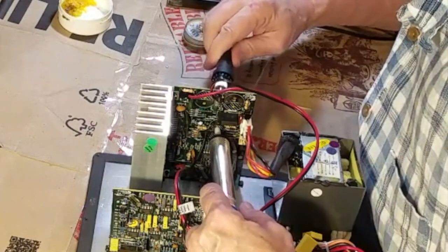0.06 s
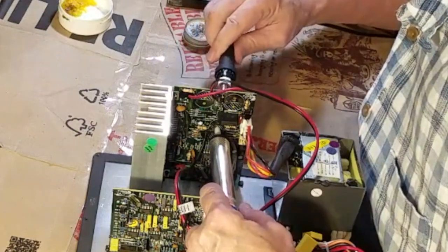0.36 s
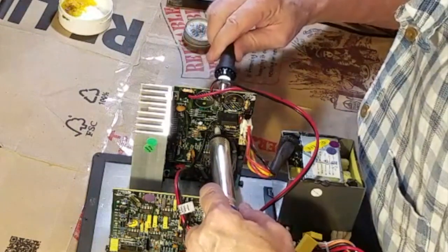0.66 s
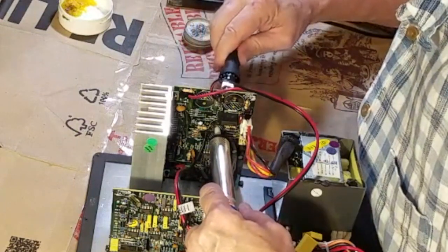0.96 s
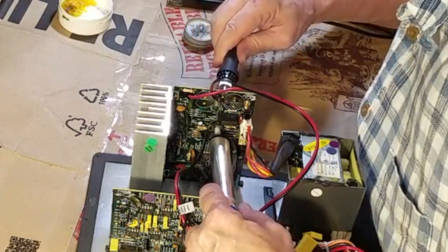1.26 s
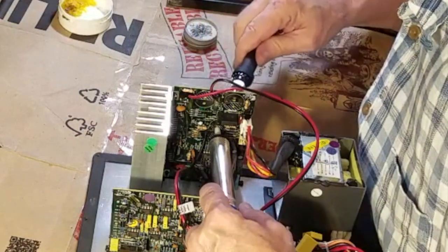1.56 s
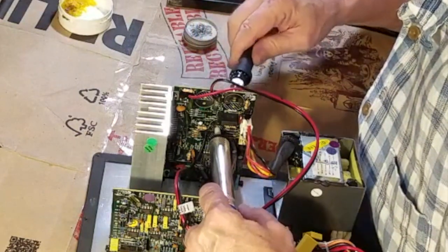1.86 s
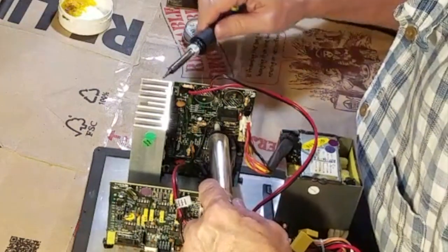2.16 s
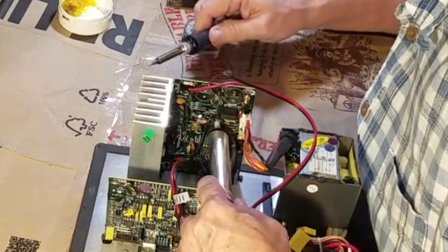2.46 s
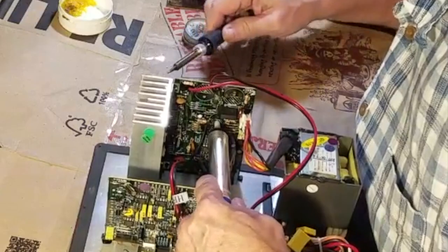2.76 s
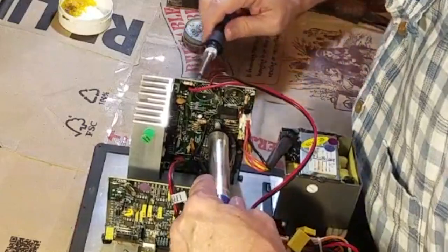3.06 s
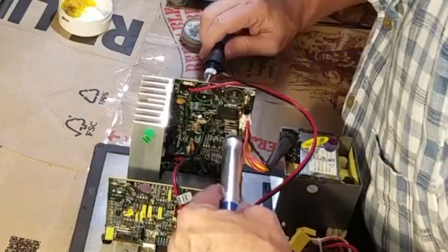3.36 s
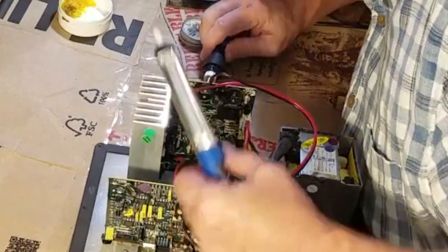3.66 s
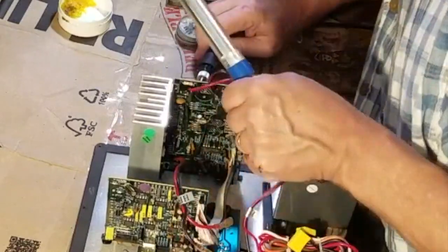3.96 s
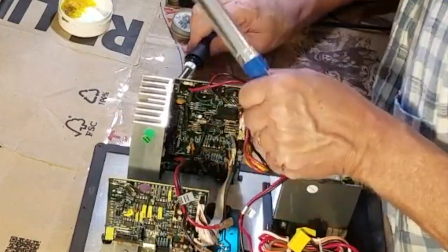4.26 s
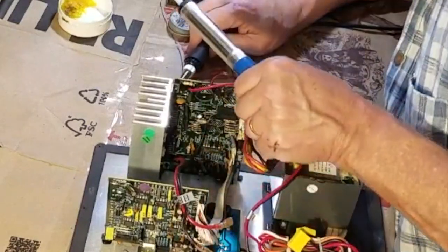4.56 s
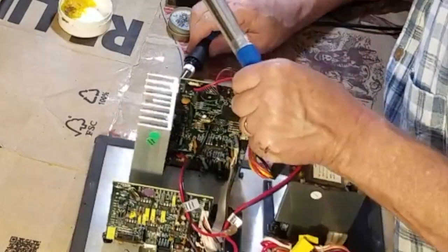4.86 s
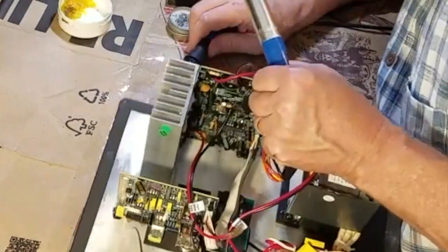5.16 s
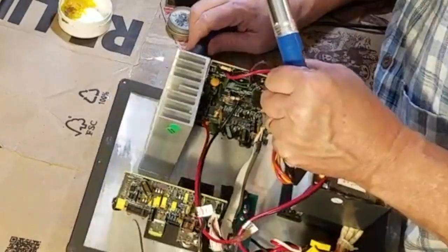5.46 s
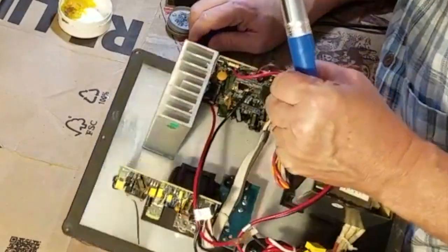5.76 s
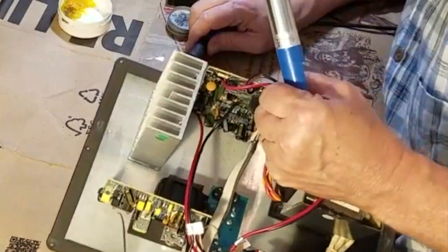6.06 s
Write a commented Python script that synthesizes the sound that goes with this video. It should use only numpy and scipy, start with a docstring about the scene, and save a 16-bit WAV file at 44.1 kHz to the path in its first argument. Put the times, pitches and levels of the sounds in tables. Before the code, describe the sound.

One sharp snap of a spring-loaded solder sucker among light tool clicks, soft arm rustles and knocks on a workbench indoors.

```python
"""A workbench in a small, hard room, where someone is removing solder from a circuit board.
Over a faint hush and whine, an arm slides softly on the paper that covers the bench. The iron and the
pump click against the board; the board and its chassis (its frame) are shifted, scrape and knock down,
and the bench top booms under each push. The pump, a spring-loaded solder sucker, fires once:
air rushes through its nozzle, the piston hits its stop, and the barrel and spring ring on."""
import sys
import numpy as np
from scipy import signal
from scipy.fft import rfft, irfft
from scipy.io import wavfile
from scipy.ndimage import uniform_filter1d

SR = 44100
rng = np.random.default_rng(int(sys.argv[2]) if len(sys.argv) > 2 else 0)


def wav_record(signal):
    """Record a signal, one row per channel, as 16-bit PCM in the file named by sys.argv[1]."""
    frames = np.transpose(np.atleast_2d(signal))
    bounded = np.clip(frames, -1, 1)
    # unit amplitude maps onto the largest positive 16-bit level
    quanta = np.round(bounded * 32767).astype(np.int16)
    wavfile.write(sys.argv[1], SR, quanta)


N = 273420
TIME = np.arange(N) / SR
FREQUENCIES = np.fft.rfftfreq(N, 1 / SR)

# Levels in the tables are relative. A fade is the time a sound takes to drop by 60 dB.
# how alike left and right are: f/Hz, likeness (1 = the same)
STEREO_LIKENESS = [(60, 0.91), (130, 0.77), (290, 0.66), (640, 0.28), (1400, 0.034), (15000, 0)]
# how much louder left is than right: f/Hz, level/dB
LEFT_OVER_RIGHT = [(60, -1), (1300, -0.9), (2400, -0.6), (4400, 0.5), (8100, 3), (15000, 3.5)]
# length of the room's echo: f/Hz, fade/s
ECHO_FADE = [(60, 1), (150, 0.8), (1000, 0.66), (2200, 0.58), (3500, 0.51), (6000, 0.62), (9000, 0.47),
             (15000, 0.31)]
# strength of that echo: f/Hz, level/dB
ECHO_TONE = [(60, 0), (120, -7.5), (220, -4.5), (600, -3), (1500, -1.5), (2600, -2.5), (4200, -2.5),
             (9000, -3), (15000, -0.5)]
# hush of the quiet room: f/Hz, level/dB
HUSH_TONE = [(10, -26), (25, -11), (45, -7), (130, -4.5), (210, -12.5), (310, -10), (450, -16.5),
             (900, -19.5), (1500, -23), (2900, -25.5), (5500, -34), (9300, -37.5), (12500, -31),
             (15500, -28)]
# tones of mains-powered equipment: f/Hz, level/dB
WHINE_NOTES = [(107.7, -80), (301.5, -80), (14691, -87)]
# strokes of the arm: t/s, length/s, level/dB
ARM_STROKES = [(1.386, 0.14, -58.5), (1.887, 0.37, -68.5), (2.693, 0.24, -64), (2.82, 0.21, -59),
               (2.977, 0.38, -62.5), (3.3, 0.34, -58), (3.626, 0.4, -67), (3.958, 0.38, -59.5),
               (4.193, 0.7, -58.5), (4.75, 0.68, -69), (5.13, 0.08, -57)]
# hiss of the arm on paper: f/Hz, level/dB
PAPER_TONE = [(300, 3.5), (1000, -2), (2800, 0.5), (4500, -4), (7000, -4.5), (9500, -8), (11500, -2),
              (13200, 0.5), (15800, -3)]
# drags of the chassis on the bench: t/s, length/s, level/dB
CHASSIS_DRAGS = [(3.106, 0.054, -60.5), (3.177, 0.27, -44.5), (5.997, 0.13, -61.5)]
# noise of a drag: f/Hz, level/dB
CHASSIS_DRAG_TONE = [(70, -12), (130, -0.5), (300, 1), (450, -4.5), (650, 2), (900, -4), (1200, -1.5),
                     (2400, -9.5), (5000, -19), (15000, -33)]
# noise of the skidding chassis: f/Hz, level/dB
CHASSIS_SKID_TONE = [(130, -17.5), (230, -4), (275, -2), (390, -6.5), (490, -21), (690, -9), (900, -19.5),
                     (1350, -17), (1750, -6), (2100, -16.5), (3000, -18), (5000, -31), (15000, -38)]
# clicks on the board, from tools touching it and, at 4.584 s, from the chassis as it starts to skid: t/s,
# level/dB, middle f/Hz, low body level/dB, metallic edge level/dB
BOARD_CLICKS = [(0.0101, -46, 2860, 2, -8.5), (0.3096, -56.5, 2630, -5, -20), (0.8634, -59, 2730, -10, -26),
                (1.5106, -34.5, 2220, -4, -19), (1.708, -46, 2540, -2.5, -20),
                (1.9282, -46.5, 2190, 4.5, -6), (2.1333, -52, 1700, -18, 7), (3.1948, -28, 1900, -16, -8),
                (3.3021, -25.5, 2420, -8.5, -32), (3.8096, -44.5, 1300, 3, -17),
                (4.0645, -45.5, 1730, 3, -13), (4.4124, -44.5, 1680, -3.5, -25), (4.4968, -47, 2540, 4, -8),
                (4.584, -43, 1790, -13, -21), (4.8259, -46.5, 1640, 8, -22),
                (4.9676, -27.5, 1290, -13, -24.5), (4.9954, -30.5, 1310, 6.5, -11),
                (5.0564, -36, 1440, 4, -30), (5.1182, -27.5, 1700, -13.5, -38),
                (5.131, -43, 1750, -15, -18), (5.1591, -38.5, 3670, -23, -6), (5.678, -41.5, 2430, -2, -21)]
# pushes on the bench top: t/s, level/dB
BENCH_PUSHES = [(2.209, -31), (3.245, -42), (3.417, -34), (4.043, -37), (4.445, -38.5), (4.854, -42),
                (4.9685, -15.5), (5.41, -44), (6.035, -39.5)]
# notes the bench top rings at: f/Hz, level/dB, fade/s
BENCH_NOTES = [(111.55, 2, 0.35), (124.2, -3, 0.15), (62.8, -25, 1.12), (47.2, -23, 0.75),
               (147.5, -17, 0.56), (92, -25, 0.084)]
# dull blows on the chassis: t/s, level/dB
CHASSIS_KNOCKS = [(0.231, -59), (2.2109, -33), (2.22, -42), (2.975, -54.5), (3.415, -42.5), (4.044, -51.5),
                  (4.9690, -26), (4.972, -20.5), (5.225, -54)]
# thud of the loose parts: f/Hz, level/dB
THUD_TONE = [(80, -37), (150, -2.5), (205, -13.5), (250, -6), (370, -6), (480, -13.5), (650, -8),
             (880, -10), (1250, -26.5), (1450, -41), (2300, -35.5), (4000, -48), (12000, -71)]
# notes the chassis rings at: f/Hz, level/dB, fade/s
CHASSIS_NOTES = [(228, -27, 0.6), (300, -26.5, 0.45), (360.6, -22.5, 0.46), (492, -28, 0.17),
                 (582, -19, 0.29), (630, -30, 0.24), (657, -31, 0.2), (874, -23.5, 0.53), (956, -35, 0.081),
                 (1132, -18.5, 0.084)]
# puffs of air, as the piston sets off and after it bounces: t/s, level/dB
AIR_PUFFS = [(2.208, -30.5), (2.262, -43)]
# air rushing through the nozzle: f/Hz, level/dB
NOZZLE_TONE = [(180, -26), (300, -20), (536, -5.5), (735, -8), (911, -8), (1130, -10.5), (1430, 2.5),
               (1680, -25), (1920, -9), (2960, -6.5), (3490, -8), (5840, -8), (8700, -11.5), (13600, -2.5),
               (15800, -10.5)]
# the piston hits its stop and bounces: t/s, level/dB
PISTON_HITS = [(2.231, -30.5), (2.242, -28.5), (2.245, -32)]
# clack of the piston: f/Hz, level/dB
PISTON_TONE = [(300, -32), (1200, -0.5), (2800, 4), (4500, -15), (15000, -28)]
# notes of the pump's barrel and spring: f/Hz, level/dB, fade/s
BARREL_NOTES = [(497, -35, .13), (1384, -58, .42), (1420, -56, .5), (1906, -53, .4), (2305, -52, .3),
                (2863, -53, .6), (6837, -57, .45), (11842, -49, .25), (11936, -52, .36), (13068, -51, .42),
                (13227, -47, .44), (13812, -44, .24), (14142, -46, .24)]
# deep notes set off by the pump's jolt: f/Hz, level/dB, fade/s
JOLT_NOTES = [(45.4, -44.5, 1), (72, -47, 0.5), (89, -36, 0.26)]


def amp(db):
    """Turns decibels into a number to multiply by."""
    return 10 ** (np.asarray(db) / 20)


def unit(x):
    """Scales a signal to an average strength (rms) of one."""
    return x / np.sqrt(np.mean(x ** 2) + 1e-20)


def read(table, hz):
    """Looks up a frequency in a table, blending between rows by pitch."""
    f, value = np.transpose(table)
    return np.interp(np.log(hz + 1), np.log(f + 1), value)


def hump(hz, centre, octaves, steep=1.126):
    """A bell curve around a pitch, steeper on its high side."""
    away = np.log2((hz + 1) / centre) / octaves
    return np.exp(-(away * np.where(away > 0, steep, 1)) ** 2)


def add(mix, start, sound):
    """Mixes a sound in at a start time in seconds."""
    part = mix[..., max(round(start * SR), 0):][..., :sound.shape[-1]]
    part += sound[..., :part.shape[-1]]


def pair(x):
    """Turns two unrelated noises into a left and a right that share their bass."""
    left, other = rfft(x)
    same = np.clip(read(STEREO_LIKENESS, np.fft.rfftfreq(x.shape[1], 1 / SR)), -1, 1)
    right = same * left + np.sqrt(1 - same ** 2) * other
    return irfft(np.array([left, right]), x.shape[1])


def colour(x, db_at, size=4096):
    """Turns each frequency up or down by db_at(hz), with no ringing before the sound starts."""
    hz = abs(np.fft.fftfreq(size, 1 / SR))
    log_gain = np.log(amp(np.maximum(db_at(hz), -100)))
    response = np.exp(np.conj(signal.hilbert(log_gain)))
    taps = np.fft.ifft(response).real[:size // 2]
    return signal.oaconvolve(x, taps[None], axes=1)[:, :x.shape[1]]


def wander(samples):
    """A random wobble, smoothed over this many samples."""
    return unit(uniform_filter1d(rng.standard_normal(N), size=samples))


def rough_noise(tone, grain_db):
    """Noise with a flickering level, like the countless tiny slips of rubbing."""
    grains = amp(grain_db * wander(90))
    noise = pair(rng.standard_normal((2, N))) * grains
    return unit(colour(noise, lambda hz: read(tone, hz)))


def ring(notes, t):
    """The fading pure tones of a struck object."""
    return sum(amp(db) * 1e-3 ** (t / fade) * np.sin(2 * np.pi * hz * t) for hz, db, fade in notes)


def burst(decay_s, db_at, rise_s=0.00065, size=4096):
    """The quickly dying noise of a hit, scaled by the strength of its first milliseconds."""
    t = np.arange(size) / SR
    envelope = np.exp(-t / decay_s) * (1 - np.exp(-t / rise_s))
    x = colour(pair(rng.choice([-1., 1.], (2, size))) * envelope, db_at)
    return x / np.sqrt(np.mean(x[:, :size // 32] ** 2))


def gesture(start, length, db, rise_s, sag_db_per_s, release_s):
    """Loudness over time: rises quickly, sags while it lasts, then dies away."""
    t = np.maximum(TIME - start, 0)
    rise = np.minimum(t / rise_s, 1)
    release = np.exp(-np.maximum(t - length, 0) / release_s)
    return rise * amp(db - sag_db_per_s * t) * release


def room_echo(x, delay_s=0.0021, build_s=0.0013):
    """Reflections from the walls build up quickly; each pitch fades at its own speed."""
    t = np.arange(SR) / SR
    hz, when, bands = signal.stft(pair(rng.standard_normal((2, SR))), SR, nperseg=256)
    fade = read(ECHO_FADE, hz)[:, None]
    even_energy = np.sqrt(2 * np.log(1000) / (fade * SR))  # a longer fade adds no energy
    bands = bands * 1e-3 ** (when / fade) * even_energy * amp(read(ECHO_TONE, hz))[:, None]
    tail = signal.istft(bands, SR, nperseg=256)[1][:, :SR]
    build_up = 1 - np.exp(-np.maximum(t - delay_s, 0) / build_s)
    return signal.fftconvolve(x[:1], tail * build_up, axes=1)[:, :N]


def room_hush(db=-64):
    """The soft, steady noise of a quiet room."""
    noise = pair(rng.standard_normal((2, N)))
    return amp(db) * unit(irfft(rfft(noise) * amp(read(HUSH_TONE, FREQUENCIES)), N))


def equipment_whine():
    """Mains-powered equipment gives off faint, wavering tones."""
    waver = wander(3000)
    return sum(amp(db) * np.sqrt(2) * np.sin(2 * np.pi * (hz * TIME + rng.random()) + waver)
               for hz, db in WHINE_NOTES)


def sliding_arm(speed_power=0.8):
    """An arm rubs over paper; the hiss swells and sinks as each stroke speeds up and slows down."""
    loudness = np.zeros(N)
    for start, length, db in ARM_STROKES:
        progress = np.clip((TIME - start) / length, 0, 1)
        speed = np.maximum(np.sin(np.pi * progress), 0)
        loudness += amp(db) * speed ** speed_power
    return loudness * rough_noise(PAPER_TONE, grain_db=1.0)


def scrapes(release_s=0.026):
    """The chassis drags, and once skids briefly; each scrape breaks loose, slows and stops."""
    drag = sum(gesture(start, length, db, rise_s=0.025, sag_db_per_s=41, release_s=release_s)
               for start, length, db in CHASSIS_DRAGS)
    skid = gesture(start=4.574, length=0.11, db=-43.5, rise_s=0.016, sag_db_per_s=104,
                   release_s=release_s)
    drag_noise = rough_noise(CHASSIS_DRAG_TONE, grain_db=3.8)
    skid_noise = rough_noise(CHASSIS_SKID_TONE, grain_db=2)
    return drag * drag_noise + skid * skid_noise


def board_clicks(gain_db=-7, body_gain_db=3, edge_gain_db=-4, decay_s=0.0039):
    """Tools tap the board, and the chassis clicks as it starts to skid; each click has a hard middle, a low
    body and a metallic edge."""
    out = np.zeros((2, N))
    for start, db, middle_hz, body_db, edge_db in BOARD_CLICKS:
        def tone(hz):
            middle = hump(hz, middle_hz, octaves=0.89)
            body = amp(body_db + body_gain_db) * hump(hz, centre=520, octaves=1.45)
            edge = amp(edge_db + edge_gain_db) * hump(hz, centre=13200, octaves=4.1)
            return 20 * np.log10(middle + body + edge + 1e-4)
        add(out, start, amp(db + gain_db) * burst(decay_s, tone))
    return out


def bench_booms(firm_db=-36, firm_rise_s=0.014, slower_s_per_db=0.006):
    """The bench top booms after each push; the gentler the push, the slower the boom builds."""
    out, t = np.zeros((2, N)), np.arange(SR) / SR
    boom = ring(BENCH_NOTES, t)
    for start, db in BENCH_PUSHES:
        rise_s = firm_rise_s + slower_s_per_db * max(firm_db - db, 0)
        add(out, start, amp(db) * boom * (1 - np.exp(-t / rise_s)))
    return out


def chassis_knocks(contact_s=0.00058, thud_db=-7, thud_decay_s=0.0099):
    """Each blow on the chassis gives a short push of air and a thud of the loose parts."""
    out = np.zeros((2, N))
    age = np.arange(SR // 10) / SR / contact_s  # time, counted in contact lengths
    air_push = age * (2 - age) * np.exp(-age)
    for start, db in CHASSIS_KNOCKS:
        thud = burst(thud_decay_s, lambda hz: read(THUD_TONE, hz))
        add(out, start, amp(db) * air_push)
        add(out, start, amp(db + thud_db) * thud)
    return out


def chassis_ring(gain_db=-1):
    """The chassis rings on after every knock."""
    out = np.zeros((2, N))
    ringing = ring(CHASSIS_NOTES, np.arange(SR // 2) / SR)
    for start, db in CHASSIS_KNOCKS:
        add(out, start, amp(db + gain_db) * ringing)
    return out


def pump_ring(start=2.212, rise_s=0.003):
    """After the shot the barrel and spring sing on, over a deep swing from the pump's jolt."""
    out, t = np.zeros((2, N)), np.arange(SR) / SR
    ringing = ring(BARREL_NOTES, t) + ring(JOLT_NOTES, t)
    add(out, start, ringing * (1 - np.exp(-t / rise_s)))
    return out


def pump_shot(clack_db=-6, clack_decay_s=0.0035):
    """The spring throws the piston back: air rushes in, and the piston clacks against its stop."""
    rush = sum(gesture(start, length=0.048, db=db, rise_s=0.0045, sag_db_per_s=258, release_s=0.012)
               for start, db in AIR_PUFFS)
    out = rush * rough_noise(NOZZLE_TONE, grain_db=2.0)
    for start, db in PISTON_HITS:
        clack = burst(clack_decay_s, lambda hz: read(PISTON_TONE, hz))
        add(out, start, amp(db + clack_db) * clack)
    return out


def scene(boom_echo_db=-14, knock_echo_db=1):
    """Adds up the work at the bench, its echo in the room and the background."""
    clicks, booms, knocks = board_clicks(), bench_booms(), chassis_knocks()
    shot, scraping = pump_shot(), scrapes()
    direct = clicks + scraping + booms + knocks + chassis_ring() + shot + pump_ring()
    echo = room_echo(clicks + scraping + amp(boom_echo_db) * booms + amp(knock_echo_db) * knocks + shot)
    background = room_hush() + equipment_whine() + sliding_arm()
    return background + echo + direct


def record(dry, top_hz=15850):
    """The left microphone is the brighter one, and the very highest treble is cut off."""
    tilt_db = np.outer([.5, -.5], read(LEFT_OVER_RIGHT, FREQUENCIES))
    tilted = irfft(rfft(dry) * amp(tilt_db), N)
    treble_cut = signal.firwin(511, top_hz, window=("kaiser", 9), fs=SR)
    return signal.oaconvolve(tilted, treble_cut[None], "same")


dry = scene()
out = record(dry)
wav_record(out)
```